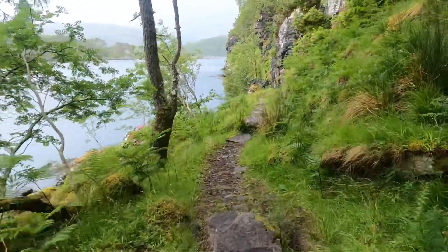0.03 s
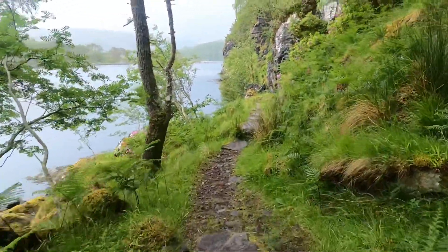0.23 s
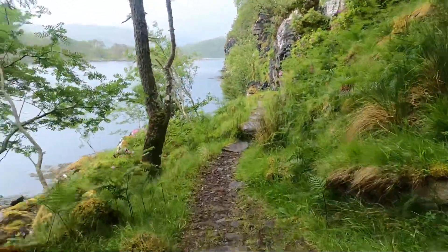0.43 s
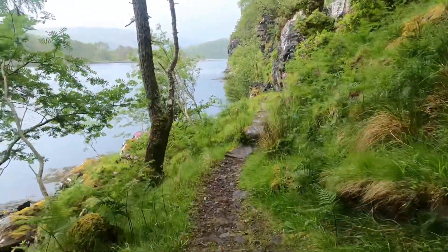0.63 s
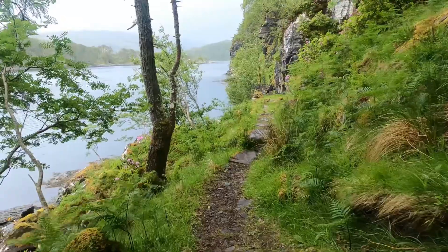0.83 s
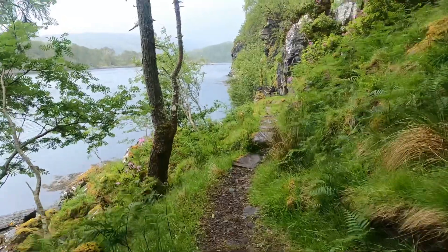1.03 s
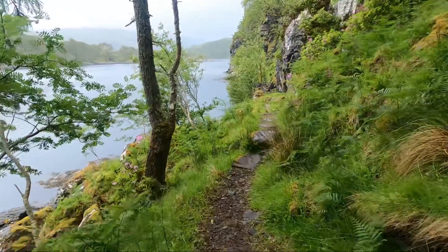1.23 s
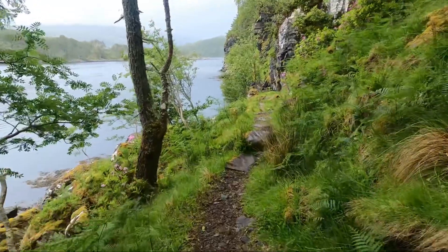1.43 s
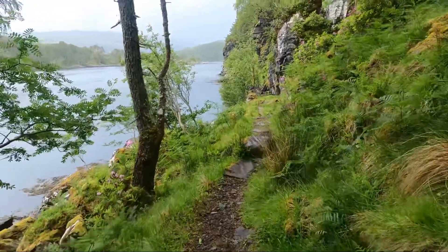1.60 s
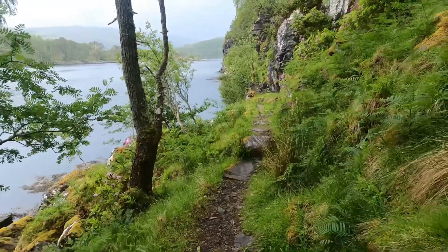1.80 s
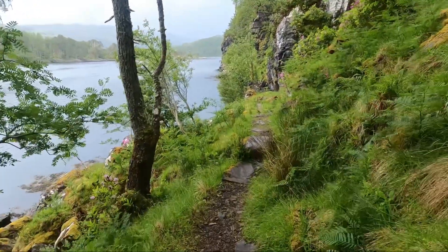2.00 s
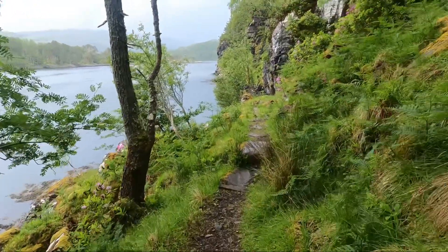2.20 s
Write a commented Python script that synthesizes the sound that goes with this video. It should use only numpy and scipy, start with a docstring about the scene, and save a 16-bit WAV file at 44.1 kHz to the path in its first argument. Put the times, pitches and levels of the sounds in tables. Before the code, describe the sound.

Slow footsteps thud and crunch on a stony lakeside path. A loose slab clatters early, pebbles knock together, and later something brittle cracks sharply underfoot. Faint breeze and water hiss behind, with soft wind rumble on the microphone.

```python
"""Slow steps on a stony lakeside path

Each step thuds, grinds grit and knocks pebbles together; one clatters on a loose slab, another
cracks something brittle, and a flat stone clinks as it settles. The hardest steps rock the
hand-held camera. Behind them breeze and water hiss, air nudges the microphone and a small bird
whistles thinly far off."""
import sys
import numpy as np
from scipy import signal
from scipy.fft import rfft, irfft, next_fast_len
from scipy.io import wavfile

SR = 44100
rng = np.random.default_rng(int(sys.argv[2]) if len(sys.argv) > 2 else 0)


def bounce(signal):
    """Save signal as a 16-bit WAV file at the path given by the first command-line argument."""
    frames = np.transpose(np.atleast_2d(signal))
    limited = np.clip(frames, -1, 1)
    pcm = np.round(limited * 32767).astype(np.int16)
    wavfile.write(sys.argv[1], SR, pcm)


N = 103635
T = np.arange(N) / SR


def from_db(db):
    """Decibels to gain."""
    return 10 ** (np.asarray(db) / 20)


def fader(points):
    """A gain curve through (time_s, level_db) points."""
    return from_db(np.interp(T, *np.transpose(points)))


def rms_one(x):
    """Scale to unit power."""
    return x / np.sqrt(np.mean(x ** 2) + 1e-20)


def panned(x, pan_db):
    """Place a sound by level difference; positive is left."""
    return x * from_db(np.array([[.5], [-.5]]) * pan_db)


def at_hz(points, hz):
    """Read a curve on a log-frequency axis."""
    freqs, values = np.transpose(points)
    return np.interp(np.log(hz + 1), np.log(freqs), values)


def coloured(x, spectrum):
    """Give a white signal a spectrum, at unit power."""
    size = next_fast_len(N)
    gain = from_db(at_hz(spectrum, np.fft.rfftfreq(size, 1 / SR)))
    return rms_one(irfft(rfft(x, size) * gain, size)[..., :N])


def butter(x, hz, kind, order=2):
    """Butterworth filter."""
    return signal.sosfilt(signal.butter(order, hz, kind, fs=SR, output="sos"), x)


def dying(t, t60):
    """Decay by 60 dB in t60 seconds."""
    return np.exp(-np.log(1000) * t / t60)


def ring(hz, t60):
    """One struck mode, a quarter of a second long."""
    t = T[:SR // 4]
    return np.sin(2 * np.pi * hz * t) * dying(t, t60)


def add(out, start, x):
    """Mix a sound in at a time in seconds."""
    i = int(start * SR)
    out[..., i:i + x.shape[-1]] += x[..., :N - i]


# Stereo image of the ambience: freq_hz, left_right_correlation
AIR_LIKENESS = [(60, .8), (180, 0.94), (550, 0.82), (1650, 0.23), (5000, 1), (12000, .6)]

def wide_noise():
    """White stereo noise, partly alike in both ears."""
    size = next_fast_len(N)
    alike = at_hz(AIR_LIKENESS, np.fft.rfftfreq(size, 1 / SR))
    mid, side = rfft(rng.standard_normal((2, size)))
    return irfft(np.sqrt(1 + alike) * mid + np.sqrt(1 - alike) * side * [[1], [-1]], size)


# Tone of the low wash and of the leafy hiss: freq_hz, level_db
WASH_COLOUR = [(30, -23), (100, -30.5), (135, -6.5), (175, 3), (230, -1), (320, -4.5), (480, -7),
               (800, -16.5), (1150, -12), (1500, -14), (2500, -27), (6000, -47.5)]
HISS_COLOUR = [(150, -27), (400, 3), (800, -2), (1100, 4.5), (1450, 5), (2200, -1), (3500, -4.5),
               (5000, -4.5), (7600, -9), (8600, -18), (12800, -25.5), (14500, -68)]
# Their fader rides: time_s, level_db
WASH_LEVEL = [(0, -58), (.5, -58.5), (.82, -66), (1.3, -59), (1.65, -61.5), (1.92, -59.5), (2.05, -65.5),
              (2.35, -61.5)]
HISS_LEVEL = [(0, -58.5), (.45, -57.5), (.8, -62.5), (1.15, -59), (1.65, -58), (1.95, -63), (2.15, -60.5),
              (2.22, -68), (2.29, -67.5), (2.35, -63)]

def breeze():
    """A low bed of wind and water, with grass and leaves hissing in swells."""
    wash = fader(WASH_LEVEL) * coloured(wide_noise(), WASH_COLOUR)
    hiss = fader(HISS_LEVEL) * coloured(wide_noise(), HISS_COLOUR)
    return panned(wash + hiss, pan_db=1.5)


# Tone of the wind rumble: freq_hz, level_db
BUFFET_COLOUR = [(15, 0), (35, 3.5), (80, -9.5), (200, -17), (600, -37), (3000, -92)]
# Its gusts: time_s, level_db
BUFFET_LEVEL = [(0, -63), (.09, -51.5), (.2, -52.5), (.36, -49), (.52, -54.5), (.6, -77), (.85, -78),
                (1.0, -66), (1.2, -64), (1.4, -80.5), (1.85, -58.5), (2.08, -82.5), (2.35, -81)]

def buffeting():
    """Air nudges the microphone with a soft rumble."""
    turbulence = rng.standard_normal(N) + .4 * rng.standard_normal((2, N))
    return panned(coloured(turbulence, BUFFET_COLOUR) * fader(BUFFET_LEVEL), pan_db=-1.5)


# Thin bird calls: start_s, length_s, start_hz, end_hz, level_db
WHISTLES = [(0.792, 0.12, 8300, 7400, -73), (1.268, .08, 6240, 6140, -84), (1.865, .17, 8150, 7150, -74.5)]

def bird():
    """Falling whistles, blurred by distance into narrow bands of noise."""
    out = np.zeros(N)
    blur = rms_one(butter(rng.standard_normal((2, N)), 330, "low"))
    for start, length, start_hz, end_hz, db in WHISTLES:
        progress = np.linspace(0, 1, int(length * SR))
        glide_hz = start_hz + (end_hz - start_hz) * progress
        swell = 2 * from_db(db) * np.sin(np.pi * progress)
        add(out, start, swell * np.sin(2 * np.pi * np.cumsum(glide_hz) / SR))
    return out * blur


def surroundings(x):
    """Add quick scatter from the ground and a faint tail from the hillside."""
    t = T[:SR // 2]
    echo = 0
    for db, t60 in ((-9.5, .024), (-22, .46)):  # ground, hillside
        diffuse = rng.standard_normal(len(t)) + .57 * rng.standard_normal((2, len(t)))
        tail = diffuse * dying(t, t60) * (t > .001)
        echo = echo + from_db(db) * rms_one(tail) / np.sqrt(len(t))
    return x + signal.fftconvolve(x, echo, axes=1)[:, :N]


def grains(per_s, spread_db):
    """Random clicks of uneven size."""
    sizes = from_db(spread_db * np.minimum(rng.exponential(1, N), 4)) * rng.choice([-1, 1], N)
    return sizes * (rng.random(N) < per_s / SR)


# Tone of loose gravel: freq_hz, level_db
CRUMB_COLOUR = [(300, -11.5), (800, -10.5), (1300, -2), (2000, -7.5), (3500, -17), (7000, -22), (9000, -38),
                (15000, -58)]

def crumbs():
    """Stray crumbs of gravel tick faintly, riding the same fader as the leafy hiss."""
    ticks = coloured(grains(per_s=150, spread_db=2), CRUMB_COLOUR)
    return panned(from_db(-66) * rms_one(fader(HISS_LEVEL)) * ticks, pan_db=2.5)


# Scuffs of the sole: peak_s, level_db, rise_s, t60_s, treble_db
SCUFFS = [(0.111, -60, 0.012, 0.16, 14.5), (0.231, -43.5, 0.0098, 0.1, 10),
          (0.325, -40.5, 0.0059, 0.051, 0.5), (0.348, -47.5, 0.029, 0.11, -5),
          (0.9, -49.5, 0.0052, 0.12, 9), (0.967, -46, 0.031, 0.38, 1), (1.099, -53, 0.075, .4, 0.5),
          (1.377, -52, .005, 0.14, 2), (1.402, -45.5, .002, .15, 9), (1.42, -40.5, 0.01, .17, 0.5),
          (1.475, -50.5, 0.012, 0.057, 8.5), (1.528, -45.5, 0.0051, 0.098, 11),
          (1.539, -51, 0.0082, 0.21, 11), (1.624, -48.5, 0.0093, 0.11, 3.5), (1.73, -58, .002, .13, 14.5),
          (1.83, -65, .03, 0.34, -10), (2.153, -60.5, 0.008, 0.12, 2), (2.314, -63, 0.012, 0.17, 1)]
# Tone of the crunch: freq_hz, level_db
GRIT_COLOUR = [(180, -15), (300, -5), (396, 0), (869, -7.5), (1010, 0.5), (1470, -3), (3170, -15),
               (7300, -19.5), (9180, -32), (12300, -31), (15000, -58)]

def grit():
    """Dense grains grind under the sole, swelling and fading with each scuff."""
    body_power, treble_power = 0, 0
    for peak, db, rise, t60, treble_db in SCUFFS:
        attack = np.exp(np.minimum(T - peak, 0) / rise)
        push = from_db(db) * attack * dying(np.maximum(T - peak, 0), t60)
        body_power += push ** 2
        treble_power += (push * from_db(treble_db)) ** 2
    mid, side = (coloured(grains(per_s=5000, spread_db=4.5), GRIT_COLOUR) for _ in range(2))
    crunch = mid + from_db(-21) * side * [[1], [-1]]
    crossover_hz = 2630
    body = np.sqrt(body_power) * butter(crunch, crossover_hz, "low", order=3)
    treble = np.sqrt(treble_power) * butter(crunch, crossover_hz, "high", order=3)
    return panned(body + treble, pan_db=2.5)


# Contacts of the flat stone: start_s, level_db
CLINK_HITS = [(1.6764, -44), (1.6796, -50.5), (1.6839, -48)]
# Its ring: pitch_hz, level_db, t60_s
CLINK_MODES = [(2520, -11, 0.13), (2590, -5, 0.081), (2892, 7.5, .045), (2980, -2, .035),
               (3260, -10, 0.055), (4630, -8, .045)]

def clink():
    """A flat stone, free to ring, rattles as it settles."""
    out = np.zeros(N)
    for start, db in CLINK_HITS:
        for hz, mode_db, t60 in CLINK_MODES:
            polarity = np.sign(rng.standard_normal())
            add(out, start, polarity * from_db(db + mode_db) * ring(hz, t60))
    return panned(out, pan_db=5)


# Chatter of the loose slab: start_s, level_db
SLAB_HITS = [(0.2217, -4.5), (0.2233, -4.5), (0.2255, -2.5), (0.2271, -5)]
# Its ring: pitch_hz, level_db, t60_s
SLAB_MODES = [(614, -5, 0.034), (1060, 5.5, 0.034), (1380, -14, 0.028), (2250, -0.5, 0.022),
              (2990, 2.5, 0.03), (3320, 0.5, 0.042), (3990, -1.5, 0.027), (4560, -12, .02),
              (5500, 0.5, 0.013), (7110, -2.5, 0.02), (9030, -9, 0.019)]
# Tone of the grit beneath it: freq_hz, level_db
CRUSH_COLOUR = [(290, -23), (500, -26), (1110, 6.5), (1700, -6), (5540, 1), (6480, -21), (7160, -13),
                (12100, -23), (15000, -56)]

def slab():
    """Quick contacts ring the slab and crush the grit under it."""
    ring_db, crush_db = -30, -21.5
    ringing, pressure = np.zeros(N), np.zeros(N)
    for start, db in SLAB_HITS:
        add(pressure, start, from_db(db + crush_db) * dying(T, t60=.011))
        for hz, mode_db, t60 in SLAB_MODES:
            jitter_db = rng.standard_normal()
            gain = from_db(ring_db + db + mode_db + jitter_db)
            add(ringing, start, np.sign(jitter_db) * gain * ring(hz, t60))
    crush = pressure * coloured(rng.standard_normal(N), CRUSH_COLOUR)
    return panned(ringing + crush, pan_db=1.5)


# Brittle cracks: start_s, level_db, pitch_hz, t60_s, pan_db
SNAPS = [(.4126, -23, 1100, 0.0025, -17), (.4127, -25, 6500, 0.0015, -2), (.426, -36, 6100, 0.0011, -7),
         (.3688, -40, 6500, 0.0015, -1), (.3778, -43, 7540, .002, 9), (0.9355, -44, 5000, 0.0089, -1),
         (1.0165, -24.5, 5000, 0.0013, 2), (1.078, -36.5, 7230, 0.0053, 5), (1.3666, -35.5, 2400, .005, 1),
         (1.3982, -26.5, 4900, 0.0021, 0), (1.403, -30, 7360, 0.0061, 7), (1.419, -22, 4100, 0.0017, -3.5),
         (1.456, -35, 8000, 0.0025, 9), (1.5162, -17, 3120, .002, 3), (1.5216, -12, 7600, 0.0027, 7.5),
         (1.524, -3.5, 5360, 0.00099, 1), (1.5239, -16, 7400, 0.0052, 2), (1.5241, -24, 4520, 0.0064, -4),
         (1.5309, -23, 4600, 0.0045, 2.5), (1.541, -23, 4400, 0.0018, -5), (1.623, -35, 4500, 0.00067, 5),
         (2.152, -38, 3800, .001, 3)]

def snaps():
    """Twigs and stone chips break with a very short bright ring and a spray of splinters."""
    out = np.zeros((2, N))
    spray = rms_one(butter(rng.standard_normal(N), [1500, 11000], "band", order=1))
    for start, db, hz, t60, pan_db in SNAPS:
        tone = ring(hz, t60)
        splinters = np.roll(spray, -int(start * SR))[:len(tone)] * dying(T[:len(tone)], t60)
        add(out, start, panned(from_db(db) * (tone + from_db(-24.5) * splinters), pan_db))
    return out


# Pebble clacks: start_s, level_db, pitch_hz
PEBBLES = [(0.2157, -26, 950), (0.2552, -22, 980), (0.3219, -22, 1340), (.328, -30, 1170),
           (0.344, -30, 1310), (0.359, -35.5, 1330), (.369, -36, 1390), (0.381, -38, 1340),
           (0.4253, -24.5, 1420), (0.428, -35, 1260), (.478, -33.5, 1120), (.593, -99, 1150),
           (.620, -41, 1320), (0.641, -44, 1370), (0.715, -40.5, 1430), (0.742, -38, 1320),
           (0.9128, -31.5, 1990), (.964, -23.5, 1330), (.967, -32.5, 1190), (0.973, -34, 940),
           (.996, -29, 790), (1.091, -30, 1300), (1.101, -35, 1300), (1.131, -32.5, 1250),
           (1.215, -36.5, 1250), (1.244, -36.5, 925), (1.264, -33.5, 1550), (1.341, -35.5, 1330),
           (1.3672, -30, 1980), (1.3785, -34, 1900), (1.419, -28, 1250), (1.4233, -23, 1400),
           (1.434, -21.5, 1280), (1.4404, -26.5, 1950), (1.4414, -30, 1100), (1.466, -38, 980),
           (1.477, -40, 1580), (1.623, -30.5, 1300), (1.730, -38.5, 2130), (1.787, -41.5, 1830),
           (1.8385, -39, 844), (2.152, -48, 1340), (2.292, -47, 1180), (2.31, -49.5, 1140)]
# A pebble's ring: pitch_ratio, level_db, t60_cycles
PEBBLE_MODES = [(.62, -5, 3.2), (1, 0.5, 8.15), (1.4, -3.5, 7.8), (2.2, -15.5, 13), (3.6, -13.5, 18)]

def pebbles():
    """Pebbles knock together, damped by the soil; each has slightly different partials."""
    out = np.zeros(N)
    trim_db = 1.5
    for start, db, hz in PEBBLES:
        for k, (ratio, mode_db, cycles) in enumerate(PEBBLE_MODES):
            detune, strength = rng.standard_normal(2) * (ratio != 1)  # the main mode holds steady
            mode_hz = hz * ratio * np.exp(.13 * detune)
            gain = from_db(trim_db + db + mode_db + 2 * strength)
            add(out, start, (-1) ** k * gain * ring(mode_hz, cycles / mode_hz))
    return panned(out, pan_db=1.3)


# Jolts to the camera: start_s, level_db
JOLTS = [(0.2364, -29.5), (0.33, -32)]

def camera_rock():
    """Hard steps set the camera rocking in the hand with a low boom."""
    out = np.zeros(N)
    for start, db in JOLTS:
        add(out, start, from_db(db) * ring(hz=65.3, t60=.28))
    return out


# Soft blows of boots and handling: start_s, level_db, pitch_hz, swell_s, pan_db
THUDS = [(.131, -44.5, 94, 0.0042, -7), (0.2137, -28, 230, 0.0027, -1), (.226, -29.5, 133, 0.0087, 1),
         (.255, -34.5, 279, 0.0043, 0), (.322, -27, 128, 0.0036, 0.5), (0.4119, -26, 245, 0.0013, -14.5),
         (0.4137, -20.5, 88, 0.0023, -7.5), (.427, -26, 114, 0.0022, -9),
         (0.717, -40.5, 172, 0.00088, -15.5), (0.8958, -49, 295, 0.0037, 0), (0.8976, -33, 156, 0.0038, 0),
         (.963, -47, 414, 0.002, -2), (0.973, -36.5, 168, 0.0048, -1), (0.992, -42.5, 65, 0.0062, 0.5),
         (1.093, -54, 38.3, 0.021, -1), (1.438, -33.5, 386, 0.0049, -0.5), (1.515, -38, 196, 0.0047, 3),
         (1.518, -35.5, 517, 0.0027, 1), (1.531, -38, 151, 0.0039, -4.5), (1.546, -33, 106, 0.0043, -0.5),
         (1.574, -50, 193, 0.019, -1), (1.80, -45.5, 178, 0.0082, 0), (1.875, -49.5, 198, 0.0055, 0),
         (2.3113, -35.5, 130.3, 0.003, 0), (2.339, -47.5, 230, 0.0033, 3)]

def thuds():
    """Each blow swells and dies within a few cycles while the soil crunches a little longer."""
    out, t = np.zeros((2, N)), T[:SR // 4]
    noise = rng.standard_normal(N) + .13 * rng.standard_normal((2, N))
    soil = rms_one(butter(noise, [150, 485], "band"))
    for start, db, hz, swell, pan_db in THUDS:
        blow, give = (age * np.exp(1 - age) for age in (t / swell, t / swell / 1.5))
        thump = from_db(db) * blow ** 2 * np.sin(2 * np.pi * hz * t)
        crunch_db = -51 + .7 * (db + 35)  # harder blows crunch louder
        crunch = from_db(crunch_db) * give * np.roll(soil, -int(start * SR), axis=1)[:, :len(t)]
        add(out, start, panned(crunch - thump, pan_db))
    return out


def scene():
    """Stones and snaps, their top softened, echo outdoors over the footfalls and the ambience."""
    stones = butter(pebbles() + clink() + 1e-18, 5300, "low")  # tiny offset keeps the filters fast
    hard = stones + snaps()
    shelf_hz, shelf_db = 7660, -2
    top = from_db(shelf_db) * butter(hard, shelf_hz, "high", order=9)
    shelved = butter(hard, shelf_hz, "low", order=9) + top
    contacts = surroundings(butter(shelved, 11100, "low", order=3) + slab())
    steps = contacts + thuds() + camera_rock() + grit() + crumbs()
    return steps + breeze() + buffeting() + bird()


def record(dry):
    """A steep high cut on the whole mix."""
    cutoff_hz = 15400
    return signal.sosfilt(signal.ellip(10, .2, 80, cutoff_hz, fs=SR, output="sos"), dry)


dry = scene()
out = record(dry)
bounce(out)
```